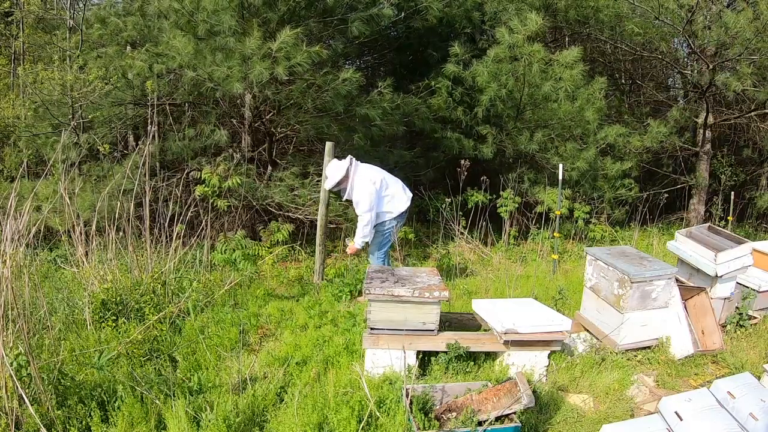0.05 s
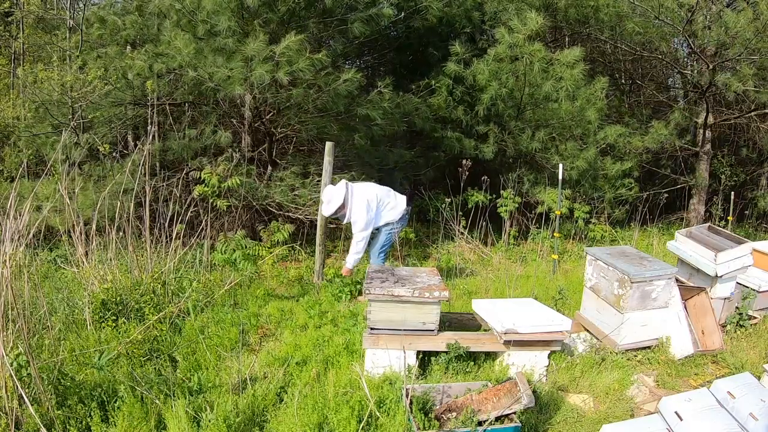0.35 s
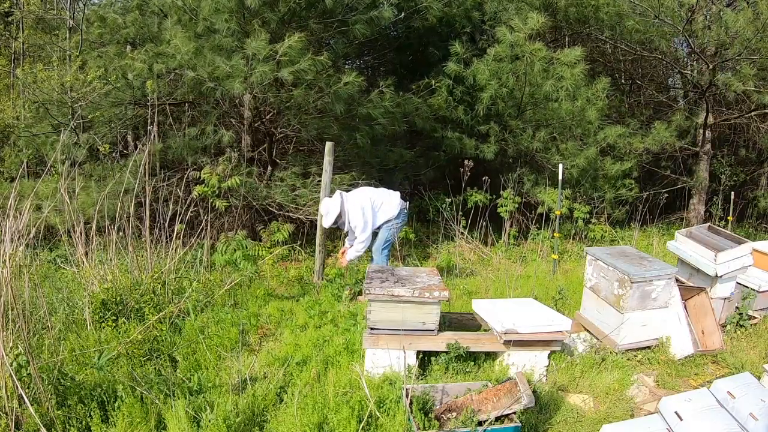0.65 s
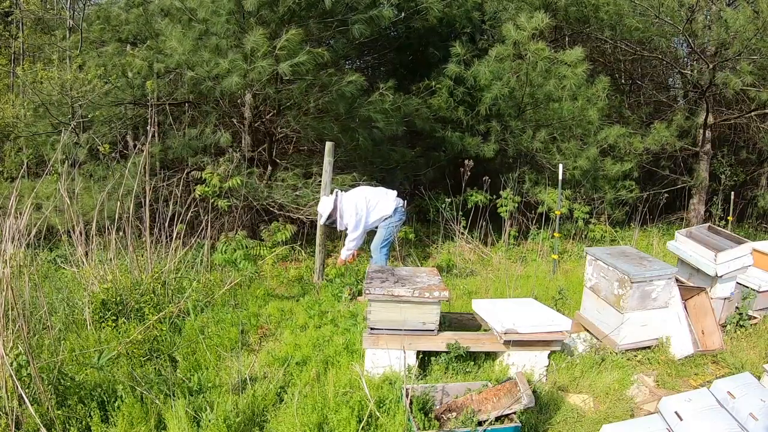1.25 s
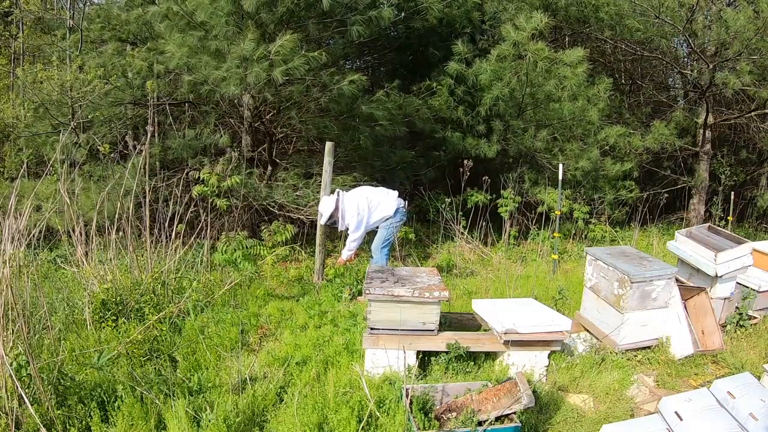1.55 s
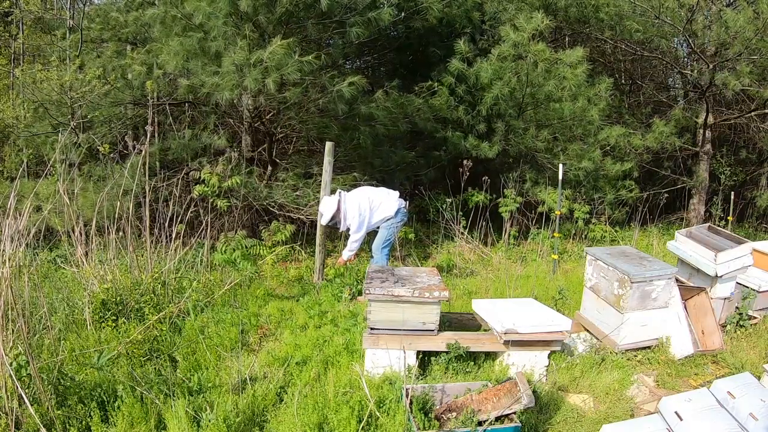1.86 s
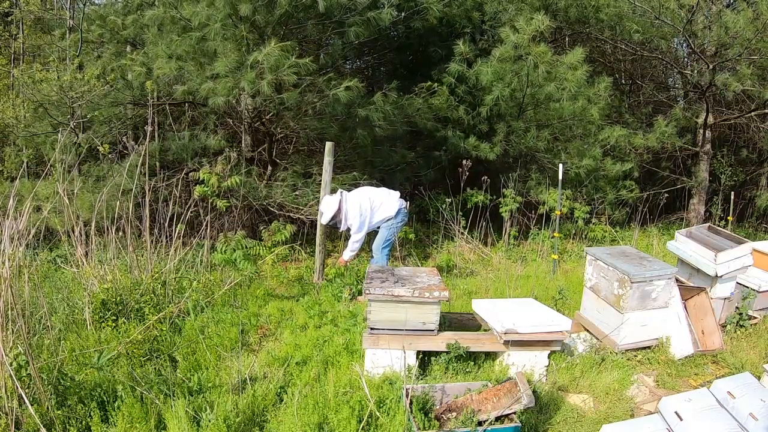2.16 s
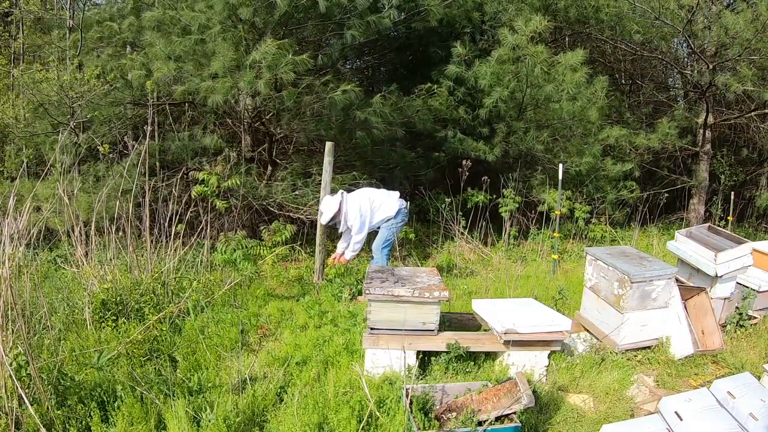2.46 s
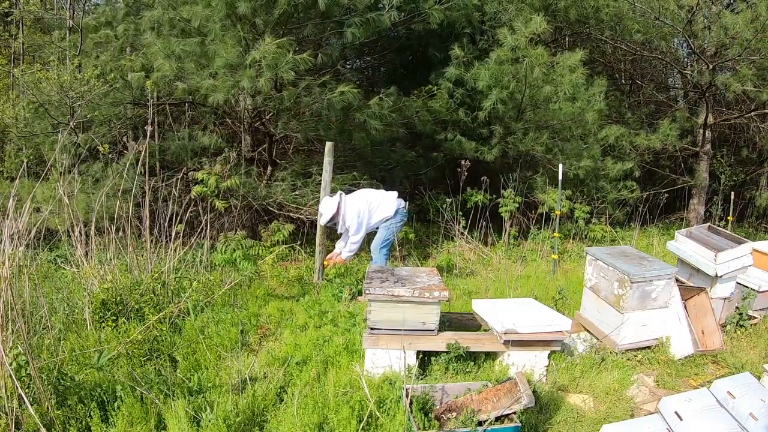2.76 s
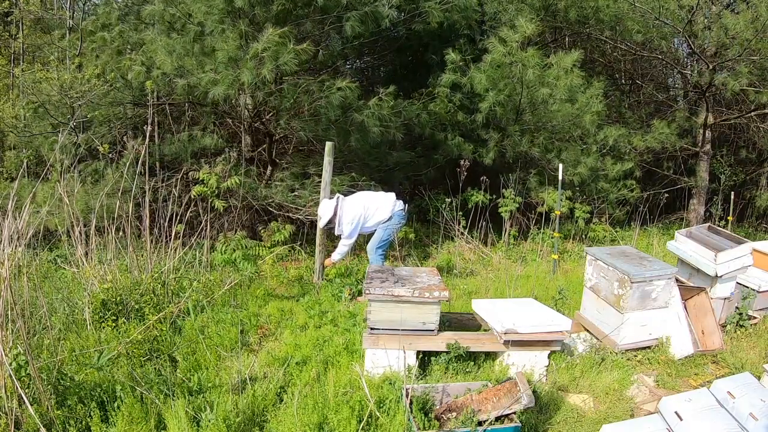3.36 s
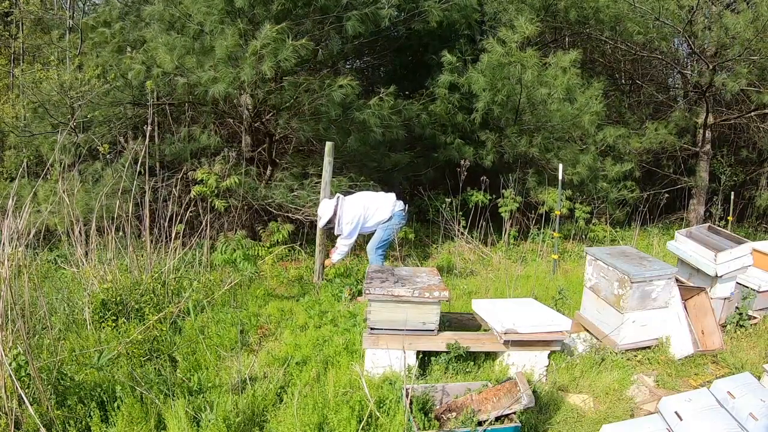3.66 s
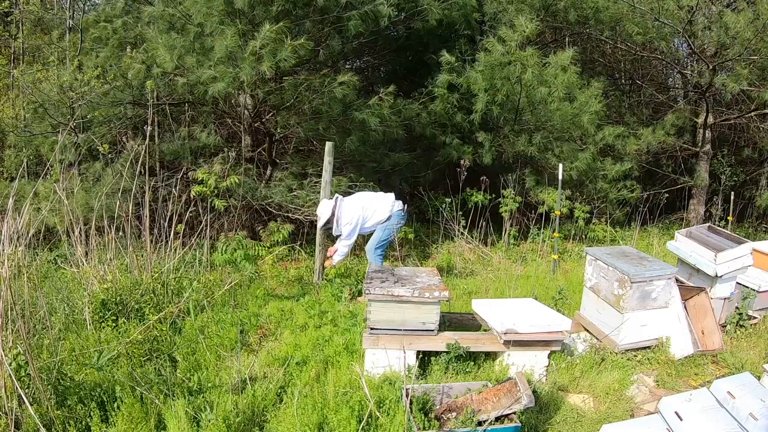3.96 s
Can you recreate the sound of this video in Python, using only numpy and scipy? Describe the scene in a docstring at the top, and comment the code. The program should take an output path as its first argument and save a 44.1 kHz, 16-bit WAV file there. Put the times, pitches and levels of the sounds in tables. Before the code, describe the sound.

Many bees hum softly throughout, swelling with a breeze in the trees to about 2.3 seconds, while low wind buffets the microphone. A sharp dry snap comes at 0.1 seconds, and loose metal rattles from 0.5 to 0.8. A faint high ring peaks near 1.9. A squeaky scrape runs from 2.2 to 2.7, followed by a few light ticks until 3.3 seconds.

```python
"""A bee yard at the edge of a pine wood. Many bees hum on their wandering wingbeats, while a breeze
swells in the trees and buffets the microphone. Someone works at the foot of a fence post: one dry
snap, a short rattle of loose metal, then a stick-slip scrape and a few light ticks, all scattered
faintly back by the wood. A thin high ring comes and goes in the background."""
import sys
import numpy as np
from scipy import signal
from scipy.fft import rfft, irfft, next_fast_len
from scipy.io import wavfile
from scipy.ndimage import uniform_filter1d, map_coordinates

SR = 44100
rng = np.random.default_rng(int(sys.argv[2]) if len(sys.argv) > 2 else 0)


def generate_wav(signal):
    """Clip the signal to [-1, 1] and save it as 16-bit WAV at the path in sys.argv[1]."""
    frames = np.transpose(np.atleast_2d(signal))
    scaled = np.clip(frames, -1, 1) * 32767
    pcm = np.round(scaled).astype(np.int16)
    wavfile.write(sys.argv[1], SR, pcm)


N = 176400


def amp(db):
    """Decibels to gain."""
    return 10 ** (np.asarray(db) / 20)


def unit(x):
    """Scale to rms 1."""
    return x / np.sqrt(np.mean(x ** 2) + 1e-20)


def clock():
    """The time of each sample."""
    return np.arange(N) / SR


def fader(points):
    """A gain curve through (time [s], level [dB]) points, held at both ends."""
    return amp(np.interp(clock(), *np.transpose(points)))


def white():
    """Fresh white noise."""
    return rng.standard_normal(N)


def wobble(rate):
    """A smooth random curve, rate knots a second."""
    return map_coordinates(rng.standard_normal(1024), [clock() * rate], mode="wrap")


def filtered(x, response):
    """x through a frequency response."""
    size = next_fast_len(N + SR // 2)
    return irfft(rfft(x, size) * response(np.fft.rfftfreq(size, 1 / SR)), size)[:N]


def coloured(x, tone):
    """x through an EQ of (frequency [Hz], gain [dB]) points, at rms 1."""
    hz, db = np.transpose(tone)
    return unit(filtered(x, lambda f: amp(np.interp(np.log(f + 1), np.log(hz + 1), db))))


def resonated(x, peaks):
    """x through steep resonances (frequency [Hz], width [Hz], gain [dB]), at rms 1."""
    def band(f, hz, width):
        return 1j * f * width / (hz * hz - f * f + 1j * f * width)
    return unit(filtered(x, lambda f: sum(amp(db) * band(f, hz, width) ** 2 for hz, width, db in peaks)))


def burst(start, rise, t60):
    """A quick attack and an exponential decay, times in seconds."""
    t = np.maximum(clock() - start, 0)
    return (1 - np.exp(-t / max(rise, 1e-5))) * np.exp(-np.log(1000) * t / t60)


def rumble(tone, window):
    """Coloured noise, its chance swells levelled over a window of samples."""
    noise = coloured(white(), tone)
    return noise / np.sqrt(np.abs(uniform_filter1d(noise ** 2, window)) + .05)


# Faders for the three layers of wind (time [s], level [dB])
SWELL_LEVEL = [(0, -15), (3.5, -12.5), (3.64, -24), (3.85, -13.5)]
BUFFET_LEVEL = [(0, -23), (.1, -24), (.22, -18), (.55, -24), (.8, -23), (1.1, -20), (1.5, -25), (1.65, -16),
                (1.78, -25.5), (2.4, -27.5), (2.68, -24.5), (3, -25), (3.1, -18), (3.22, -27), (3.48, -29),
                (3.62, -44), (3.74, -36), (4, -36)]
FLUTTER_LEVEL = [(0, -35), (.08, -38), (.2, -32), (.4, -36), (.55, -43), (.8, -43), (1.08, -30),
                 (1.25, -41), (1.55, -45), (1.65, -39), (1.85, -48), (2.25, -45), (2.5, -48), (2.68, -42),
                 (2.9, -52), (3.2, -50), (3.62, -56), (3.73, -48), (4, -48)]
# Their EQs, from subsonic heave up to bass (frequency [Hz], gain [dB])
SWELL_TONE = [(2, -7), (7, 0), (12, -1), (17, -8), (30, -44), (100, -130)]
BUFFET_TONE = [(8, -15), (16, -3), (24, 0), (30, -3), (42, -8.5), (60, -21), (120, -59), (500, -150)]
FLUTTER_TONE = [(25, -2.5), (48, 4.5), (62, -0.5), (85, -4.5), (115, -13.5), (170, -24.5), (400, -36.5),
                (2500, -130)]

def wind():
    """Air tumbling over the microphone: long heavy swells, slow buffets and a faster flutter."""
    swells = fader(SWELL_LEVEL) * rumble(SWELL_TONE, window=12000)
    buffets = fader(BUFFET_LEVEL) * rumble(BUFFET_TONE, window=9000)
    flutter = fader(FLUTTER_LEVEL) * rumble(FLUTTER_TONE, window=9000)
    return swells + amp(1) * buffets + amp(4.5) * flutter


def patchy_noise(depth_db):
    """Noise whose gain drifts in patches across time and frequency."""
    spectrum = signal.stft(white(), nperseg=512)[2]
    patches = uniform_filter1d(rng.standard_normal(spectrum.shape), 6, axis=0)
    patches = uniform_filter1d(patches, 14, axis=1)
    return signal.istft(spectrum * amp(depth_db * unit(patches)), nperseg=512)[1][:N]


# The breeze building in the pines (time [s], level [dB])
BREEZE_LEVEL = [(0, -61), (.4, -55), (.8, -53), (1.2, -50), (1.6, -48), (2, -47), (2.5, -43), (2.9, -45),
                (3.3, -49.5), (3.65, -49), (4, -45)]
# EQs for the rush of the trees and the still air under it (frequency [Hz], gain [dB])
TREES_TONE = [(60, -10), (170, 1), (310, -0.5), (400, 3), (700, -1), (1050, -1), (1500, -5), (2300, -12),
              (3900, -12), (4650, -11.5), (5400, -17.5), (9500, -20), (12000, -24), (16000, -25.5)]
STILL_AIR_TONE = [(100, 13), (600, -12), (1500, 4.5), (2300, -7), (3400, -13), (4600, -6), (5600, -9.5),
                  (10000, -9), (12000, -34), (16000, -23)]

def trees():
    """The breeze swells in the pines over a steady outdoor hiss."""
    gusts = fader(BREEZE_LEVEL) * amp(3.5 + .85 * wobble(7.83))
    rush = gusts * coloured(patchy_noise(depth_db=1.06), TREES_TONE)
    return rush + amp(-60) * coloured(white(), STILL_AIR_TONE)


# Harmonics of one bee's buzz, fundamental first (level [dB])
BEE_HARMONICS = [-4, -0.5, -11, -12.5, -25, -17]
# Fader for the whole swarm (time [s], level [dB])
HUM_LEVEL = [(0, -55), (.9, -52.5), (1.6, -48.5), (2.3, -44), (3, -48.5), (3.5, -51.5), (4, -46)]

def bees(count=20, wingbeat_hz=239):
    """Each bee buzzes at its own wandering wingbeat, drifting nearer and farther."""
    swarm = np.zeros(N)
    for _ in range(count):
        # slow drift, waver and fast jitter
        pitch = wingbeat_hz * (1 + .045 * wobble(1.2) + .035 * wobble(7) + .012 * wobble(70))
        phase = 2 * np.pi * np.cumsum(pitch) / SR
        nearness = amp(2.2 * wobble(3.05))
        buzz = sum(amp(db) * np.sin(k * phase + 2 * np.pi * rng.random())
                   for k, db in enumerate(BEE_HARMONICS, 1))
        swarm += nearness * buzz
    return fader(HUM_LEVEL) * unit(swarm)


# Bright, brittle EQ of the snap (frequency [Hz], gain [dB])
SNAP_TONE = [(300, -42), (2400, -27), (3900, -4), (6000, -6), (7700, -2), (8450, -5), (9400, 3),
             (10800, -8), (13000, -5), (16000, -7)]
# Crackles of dry grass (time [s], level [dB])
CRACKLES = [(.3126, -48.5), (.4907, -43.5), (2.372, -41), (2.413, -40)]

def snap_and_crackles(snap_s=.0892):
    """One sharp dry snap with a short tail, and fainter grass crackles of the same colour."""
    crack = burst(snap_s, rise=.00005, t60=.0058)
    tail = amp(-15) * burst(snap_s, rise=.001, t60=.058)
    crackles = sum(amp(db) * burst(start, rise=.00091, t60=.032) for start, db in CRACKLES)
    return (amp(-21) * (crack + tail) + crackles) * coloured(white(), SNAP_TONE)


# Metal hits (time [s], level [dB], decay t60 [s], send to the ring [dB], hardness [dB/octave])
RATTLE_HITS = [(0.49, -43, .026, -20, 2), (.501, -43.5, .036, -13, 4), (.569, -35.5, .04, -9, 4),
               (.5765, -25.5, 0.038, -6, 1.5), (0.583, -24.5, 0.029, -5.5, -0.5),
               (0.5914, -27, 0.047, -4, -2), (0.6003, -30.5, 0.045, -7, -2), (0.618, -37.5, 0.066, -29, -4),
               (0.6335, -31, .028, -30, -1.5), (0.7514, -33, 0.019, -9.5, -4.5), (.768, -39, .032, -13, -2)]
# EQ of a clack, before hardness tilts its treble (frequency [Hz], gain [dB])
CLACK_TONE = [(100, 4), (400, -6.5), (1000, -4.5), (1450, 1.5), (2400, -4), (3400, -4), (4150, 4.5),
              (5200, -10.5), (6200, -13), (9200, -10.5), (12000, -16.5), (16000, -26)]
# Ringing modes of the metal (frequency [Hz], level [dB], decay t60 [s])
METAL_MODES = [(4100, -10, .025), (6840, -3, .045), (6950, -3, .045), (7080, -6, .035), (7270, 0, .04),
               (7410, 0, .045), (7560, -7, .035), (9200, -7, .025)]
# Faint jingle around the hits (time [s], level [dB])
JINGLE_LEVEL = [(.46, -66), (.69, -66), (.73, -75), (.8, -70), (.92, -65), (.97, -80)]

def rattle():
    """Loose metal clatters: each hit is a gritty clack that sets it ringing; it jingles on faintly."""
    times, jingle_db = np.transpose(JINGLE_LEVEL)
    shake = np.interp(clock(), times, amp(jingle_db), left=0, right=0)
    clacks = np.zeros(N)
    for start, db, t60, send_db, hardness in RATTLE_HITS:
        force = amp(db) * burst(start, rise=.0003, t60=t60)
        tone = [(hz, gain + hardness * np.log2(max(hz, 1400))) for hz, gain in CLACK_TONE]
        clacks += force * coloured(white(), tone)
        shake += amp(send_db) * force
    ring = sum(amp(db) * burst(0, rise=.0001, t60=t60) * np.sin(2 * np.pi * (hz * clock() + rng.random()))
               for hz, db, t60 in METAL_MODES)
    return clacks + signal.fftconvolve(shake * white(), ring / np.linalg.norm(ring))[:N]


def slips(grains_per_s=3000):
    """Tiny stick-slip grains in clumps."""
    grains = np.sign(white()) * (rng.random(N) < grains_per_s / SR)
    return grains * amp(3.6 * wobble(170))


# Scraping strokes; the last row is a brief graze during the rattle
# (time [s], length [s], level [dB], squeal [Hz], rasp against squeal [dB])
STROKES = [(2.155, 0.081, -40.5, 4610, -11), (2.215, 0.2, -40.5, 4520, -11),
           (2.401, 0.087, -41.5, 4430, -7), (2.443, .14, -34, 4220, -7.5), (2.55, .085, -37.5, 4200, -11),
           (2.593, 0.11, -44.5, 4170, -10), (0.52, 0.059, -45, 4100, -2)]
# EQ of the rasp (frequency [Hz], gain [dB])
RASP_TONE = [(300, -22), (1200, -16), (2200, -4), (2700, 6), (3400, 7), (5000, -5.5), (6000, -16),
             (9500, -11.5), (13000, -19), (16000, -27)]
# Body resonances of the scraped part (frequency [Hz], width [Hz], gain [dB])
SCRAPE_BODY = [(1560, 130, 1), (2090, 190, 0), (2670, 170, -2), (3030, 160, -10), (3390, 140, -5),
               (4450, 200, -2), (5250, 220, -9), (6950, 260, -16)]
# Fader for that body (time [s], level [dB])
BODY_LEVEL = [(2.1, -61), (2.22, -54), (2.28, -45), (2.355, -38.5), (2.39, -50.5), (2.43, -41.5),
              (2.6, -52), (2.75, -77)]

def scrape(sag_db=5):
    """A run of friction strokes, each easing off, sings in a resonance that sinks stroke by stroke."""
    out = fader(BODY_LEVEL) * resonated(slips(), SCRAPE_BODY)
    for start, length, db, hz, rasp_db in STROKES:
        travel = np.clip((clock() - start) / length, 0, 1)
        pressure = np.abs(np.sin(np.pi * travel)) ** .85 * amp(-sag_db * (travel - .2))
        squeal = resonated(slips(), [(hz, 480, 0), (hz, 1200, -2)])  # narrow peak on a broad skirt
        rasp = amp(rasp_db) * coloured(slips(), RASP_TONE)
        out += amp(db) * pressure * (squeal + rasp)
    return out


# Fader for the high ring (time [s], level [dB])
RING_LEVEL = [(.7, -76), (1.3, -68), (1.9, -60), (2.6, -74)]

def high_ring(hz=4650, width_hz=180):
    """A thin band of noise at a steady pitch swells and fades far back in the mix."""
    return fader(RING_LEVEL) * resonated(white(), [(hz, width_hz, 0)])


# Light ticks (time [s], level [dB], main resonance [Hz], low resonance gain [dB])
TICKS = [(2.729, -34.5, 4680, -22), (2.821, -40.5, 4330, -20), (2.8562, -36.5, 4550, -22),
         (2.8848, -40.5, 4450, -20), (3.195, -36.5, 4420, -4), (3.302, -42.5, 4430, -18)]
# Top-end resonances of every tick (frequency [Hz], width [Hz], gain [dB])
TICK_TOP = [(7040, 360, -13), (9100, 700, -20)]

def ticks(low_hz=3290):
    """Light contacts after the scrape briefly ring the same part."""
    out = np.zeros(N)
    for start, db, hz, low_db in TICKS:
        body = [(hz, 420, 0), (low_hz, 390, low_db)] + TICK_TOP
        out += amp(db) * burst(start, rise=.0015, t60=.052) * resonated(white(), body)
    return out


def wood_scatter(x):
    """The edge of the wood throws back a short, thin reverb."""
    tail = white() * burst(0, rise=.0076, t60=.19)
    return signal.fftconvolve(x, tail / np.linalg.norm(tail))[:N]


def scene():
    """The handiwork and its reverb over a bed of bees, trees and wind, in mono."""
    work = snap_and_crackles() + rattle() + scrape() + ticks()
    return (work + amp(-13) * wood_scatter(work) + bees() + high_ring() + trees() + wind())[None]


def record(dry):
    """A brick-wall low-pass trims the very top."""
    cutoff_hz = 15800
    return np.array([filtered(channel, lambda hz: hz < cutoff_hz) for channel in dry])


dry = scene()
out = record(dry)
generate_wav(out)
```